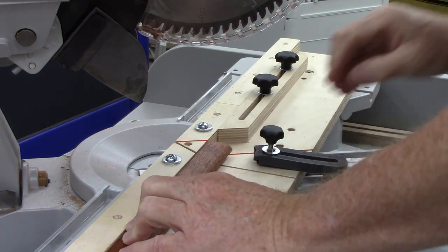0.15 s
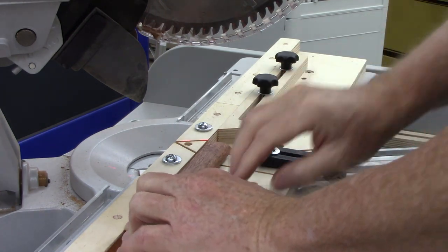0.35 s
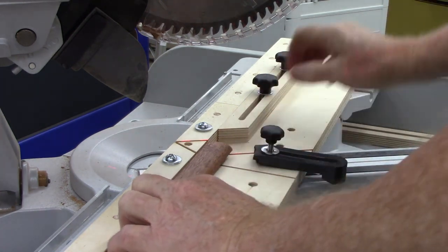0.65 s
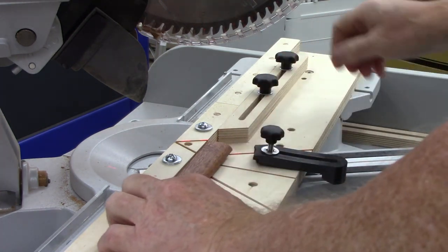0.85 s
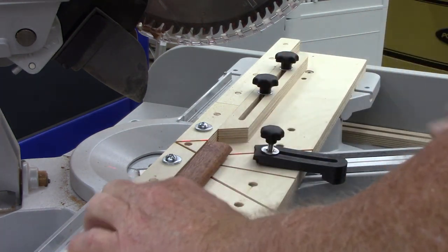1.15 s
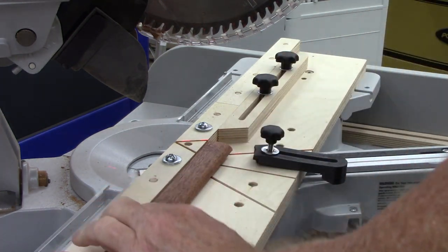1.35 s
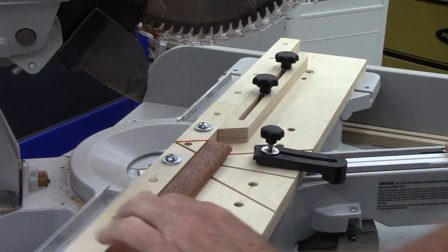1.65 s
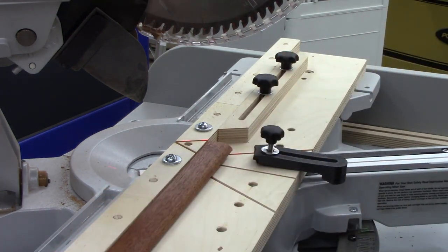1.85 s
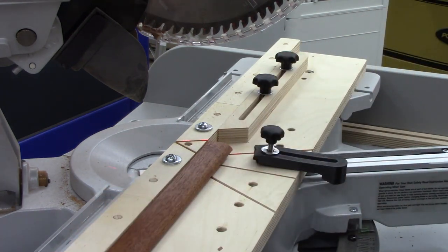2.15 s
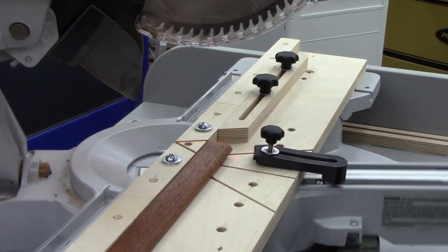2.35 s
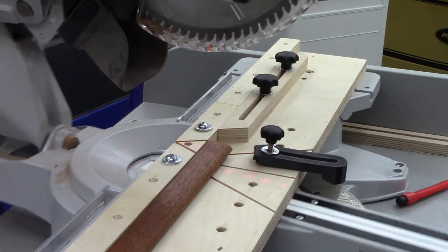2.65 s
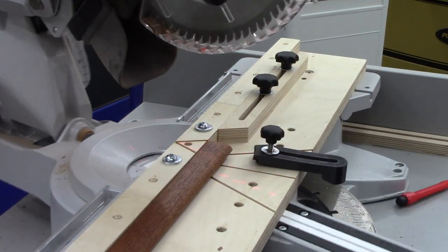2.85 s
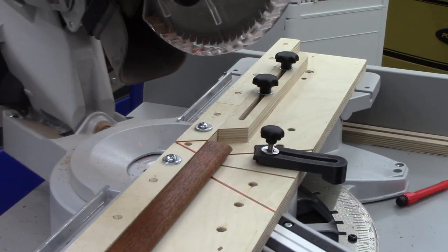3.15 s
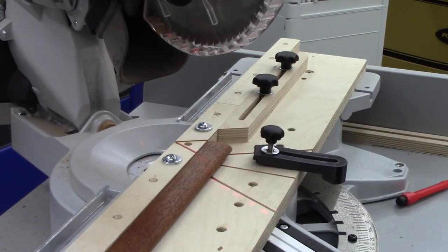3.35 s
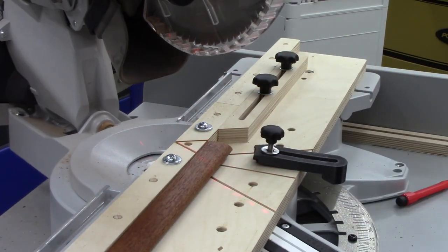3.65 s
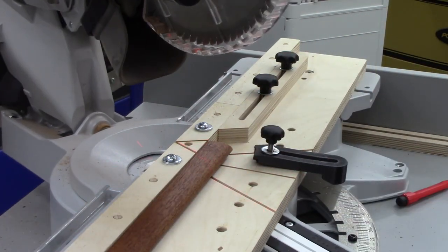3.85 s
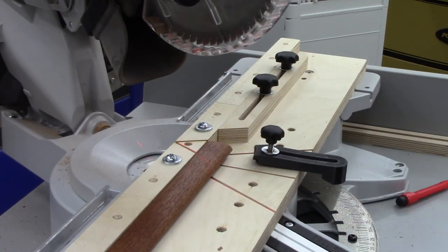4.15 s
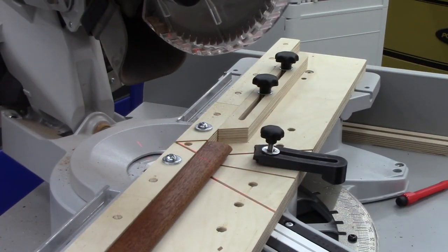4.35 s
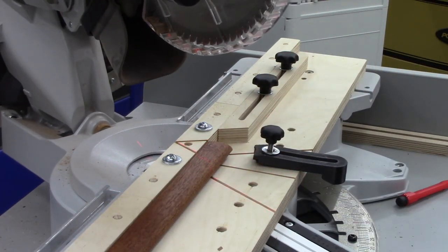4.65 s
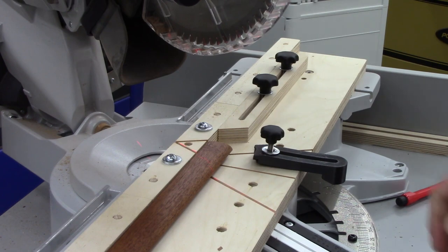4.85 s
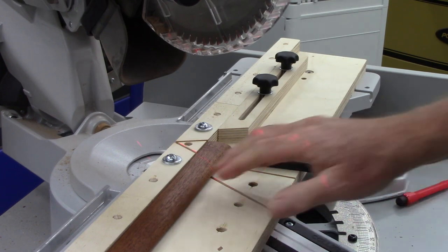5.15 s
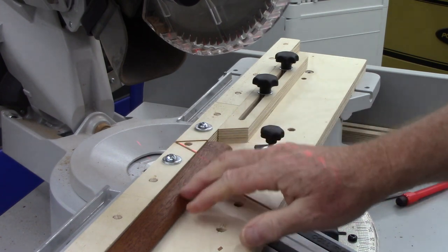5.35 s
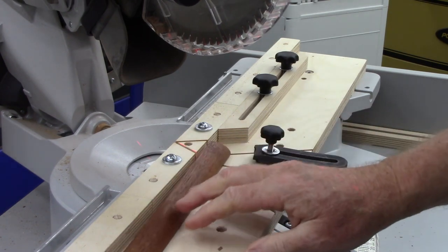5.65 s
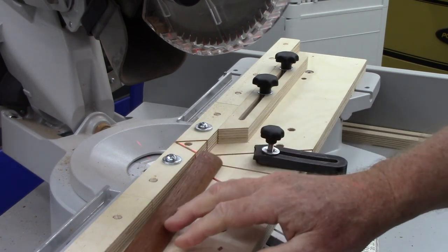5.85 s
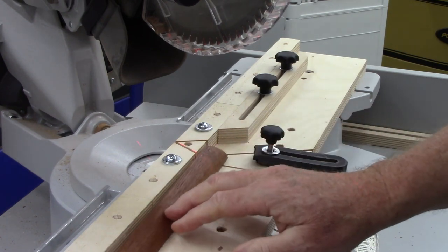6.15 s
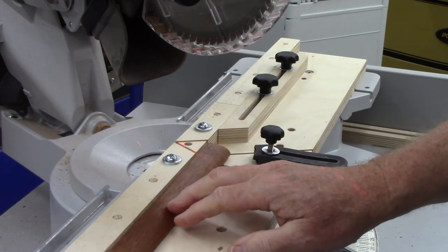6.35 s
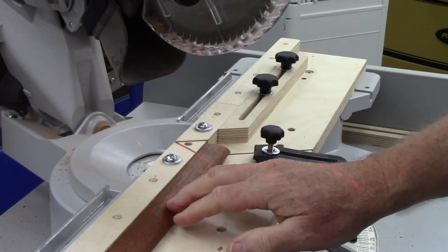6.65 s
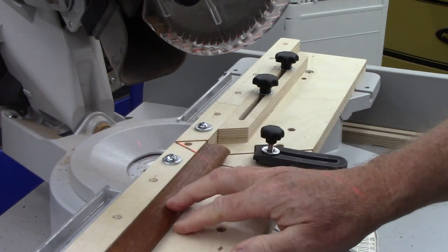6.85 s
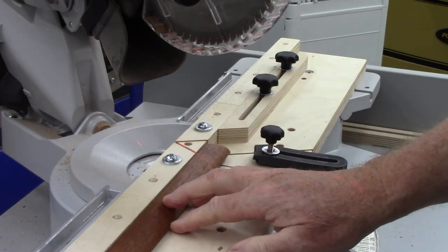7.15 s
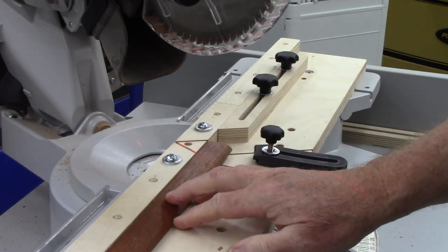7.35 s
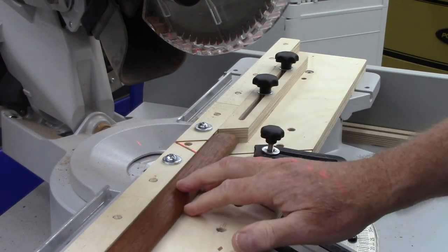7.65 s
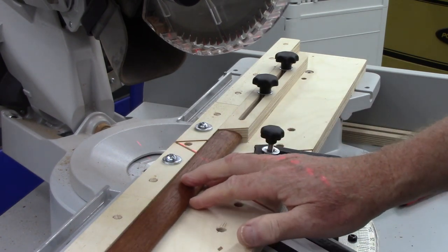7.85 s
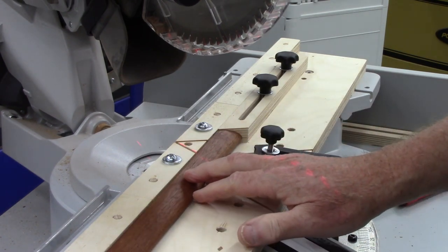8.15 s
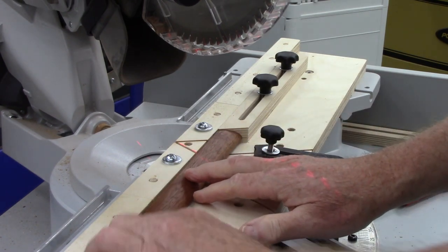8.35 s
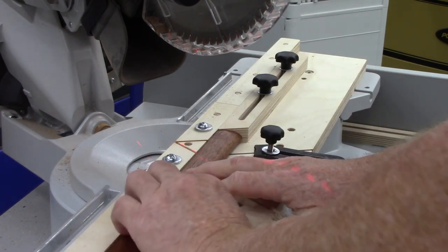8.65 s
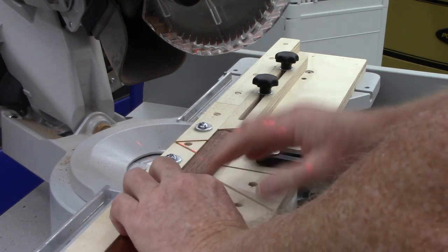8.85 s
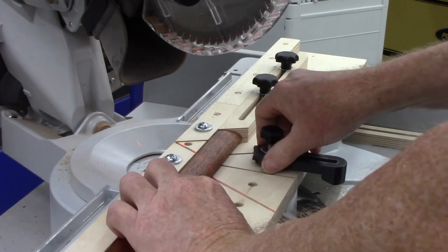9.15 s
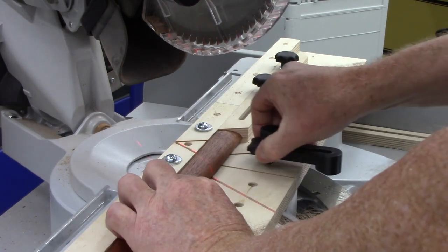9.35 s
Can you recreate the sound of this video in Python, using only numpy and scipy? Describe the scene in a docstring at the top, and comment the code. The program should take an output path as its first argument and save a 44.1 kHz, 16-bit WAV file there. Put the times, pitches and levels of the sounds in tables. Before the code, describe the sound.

In a workshop with steady low hum, the bang of a cut dies away as a saw blade winds down in an airy whoosh. A clamp clacks, a lever bangs open, a hand brushes plywood, the metal table scrapes over clicking detents and slams, then locks very loudly. A wood strip is knocked and slid with short squeaks, and a plastic clamp clatters shut. Close microphone, short room ring.

```python
"""In a workshop, a miter saw coasts down while the last bang of its cut dies away in the room.
A clamp clacks, the miter lock opens, the saw table scrapes round over its detents, slams home and is locked.
A wood strip is knocked and slid into place on a plywood sled and clamped. Blows are ringing modes with noise
bursts, rubbing is uneven noise through resonances, the blade is air noise swishing once a turn with faint tones.
Steady shop noise lies behind it all; a limiter and a soft clip hold back the loudest blows."""
import sys
import numpy as np
from scipy import signal
from scipy.fft import rfft, irfft, next_fast_len
from scipy.io import wavfile
from scipy.ndimage import uniform_filter1d, minimum_filter1d, map_coordinates

SR = 44100
rng = np.random.default_rng(int(sys.argv[2]) if len(sys.argv) > 2 else 0)


def unload_wav(signal):
    """Save mono or channel-first audio to the path in sys.argv[1] as 16-bit WAV at rate SR, clipped to [-1, 1]."""
    wavfile.write(
        sys.argv[1],
        SR,
        np.round(np.clip(np.atleast_2d(signal).T, -1, 1) * 32767).astype(np.int16),
    )


N = 418509
TIME = np.arange(N) / SR

# The bands of a blow's thud, clack, crack and tick. Each row: lower edge in Hz, upper edge in Hz.
BLOW_BANDS = [(150, 650), (650, 2000), (2000, 6000), (6000, 15000)]
# The tone of the room's answer. Each row: frequency in Hz, relative level in dB.
ROOM_TONE = [(100, 17.5), (350, 1.5), (1000, -0.5), (3000, 0), (8000, -3), (15000, -5.5)]
# The tone of the sliding strip and of the clamp's knob. Each row: frequency in Hz, relative level in dB.
STRIP_TONE = [(120, -44), (200, -5), (318, 8), (393, -2), (437, -37), (581, 2), (658, -40), (815, -3.5),
              (1140, -10), (1410, -14), (1750, -21), (3320, -22), (4180, -31), (6400, -21), (14000, -52)]


def amp(db):
    """Amplitude factor of a level in dB."""
    return 10 ** (np.asarray(db) / 20)


def unit(x):
    """x scaled to rms 1."""
    return x / np.sqrt(np.mean(x ** 2) + 1e-20)


def along(points, hz):
    """Interpolate (Hz, value) points on a log frequency axis."""
    f, v = np.transpose(points)
    return np.interp(np.log(hz + 1), np.log(f + 1), v)


def wobble(rate, size=N):
    """A smooth random curve with rate knots a second."""
    knots = rng.standard_normal(int(size * rate / SR) + 4)
    return map_coordinates(knots, [np.arange(size) * rate / SR], order=2)


def fade(t, t60):
    """Exponential decay that falls 60 dB in t60 seconds."""
    return np.exp(-np.log(1000) * t / t60)


def filtered(x, response):
    """x shaped by a response of frequency; the padding keeps the end off the start."""
    size = next_fast_len(x.shape[-1] + 4096, True)
    spectrum = rfft(x, size) * response(np.fft.rfftfreq(size, 1 / SR))
    return irfft(spectrum, size)[..., :x.shape[-1]]


def coloured(x, spectrum):
    """x shaped by a (Hz, dB) spectrum, at rms 1."""
    return unit(filtered(x, lambda hz: amp(along(spectrum, hz))))


def add(track, s, x):
    """Mix x into the track at time s in seconds."""
    part = track[max(round(s * SR), 0):][:len(x)]
    part += x[:len(part)]


def dying(spectrum, t60s):
    """Noise of energy 1 in which each frequency dies at its own speed."""
    hz, t, frames = signal.stft(rng.standard_normal(SR * 2 // 3), SR, nperseg=256)
    level = amp(along(spectrum, hz)[:, None])
    decay = fade(t, along(t60s, hz)[:, None])
    tail = signal.istft(frames * level * decay, SR, nperseg=256)[1]
    return tail / np.linalg.norm(tail)


def in_room(x, build_s=0.016, rattle_db=1.5):
    """The workshop's answer builds up as the walls reply; loose parts rattle in it."""
    # The room's decay. Each row: frequency in Hz, t60 in seconds.
    room_t60s = [(100, 0.62), (260, 0.32), (700, 0.67), (1840, 0.61), (4850, 0.62), (12800, 0.42)]
    tail = dying(ROOM_TONE, room_t60s)
    tail = tail * (1 - np.exp(-(np.arange(len(tail)) / SR / build_s) ** 2))
    rattle = unit(amp(rattle_db * wobble(169.4, size=len(tail))))
    return signal.fftconvolve(x, tail * rattle)


def contacts(rows, bounce_s, loss_db, dulling_db, tick_db):
    """Each blow may bounce, losing loss_db and dulling_db per octave each time: (s, band levels in dB)."""
    centres = np.sqrt(np.prod(BLOW_BANDS, axis=1))
    crack_octaves, tick_octaves = np.log2(centres[2:] / centres[1])
    hits = []
    for s, strength_db, thud_db, brightness, count in rows:
        for k in range(round(count)):
            slope = brightness - dulling_db * k
            colour = np.array([thud_db, 0, slope * crack_octaves, slope * tick_octaves + tick_db])
            hits.append((s + k * bounce_s, strength_db - loss_db * k + colour))
    return hits


def voiced(x, band_db, top_db):
    """Equalize a blow so that its first 12 ms come near the given level in each band."""
    head = x[:round(.012 * SR)]
    hz = np.fft.rfftfreq(SR // 10, 1 / SR)
    power = 2 * abs(rfft(head, SR // 10)) ** 2 / (SR // 10 * len(head))
    gains = []
    for (low, high), db in zip(BLOW_BANDS, band_db):
        present_db = 10 * np.log10(power[(hz > low) & (hz < high)].sum())
        gains.append((np.sqrt(low * high), db - present_db))
    bottom = [(60, gains[0][1] - 10), (170, gains[0][1] - 1)]
    gains = bottom + gains + [(16000, gains[-1][1] + top_db)]
    # minimum phase: nothing sounds before the contact
    gain = amp(along(gains, np.fft.rfftfreq(len(x), 1 / SR)))
    cepstrum = irfft(np.log(gain), len(x))
    cepstrum[1:] *= 2 * (np.arange(1, len(x)) < len(x) // 2)
    return irfft(rfft(x) * np.exp(rfft(cepstrum)), len(x))


def ringing(modes, t, ring_scale):
    """A struck part's modes as decaying sines, each with a slightly new strength and pitch."""
    ring = np.zeros(len(t))
    draws = rng.standard_normal((len(modes), 2))
    for k, ((hz, width, db), (a, b)) in enumerate(zip(modes, draws)):
        strength = amp(db + 2 * a) * np.sqrt(width) * (-1) ** k
        tone = np.sin(2 * np.pi * hz * (1 + 0.0036 * b) * t)
        ring += strength * tone * np.exp(-np.pi * width * t / ring_scale)
    return ring


def blows(hits, modes, ring_scale, crack_db, crack_t60, clatter_db, clatter_t60, room_db, attack_s, low_hz, top_db):
    """Each contact rings the modes, with a short crack and a clatter of dense low modes; the room answers."""
    crack_tone = [(200, -30.5), (900, -4), (6000, 2.5), (10000, -1), (16000, -8.5)]
    clatter_tone = [(60, -18.0), (160, -16.0), (330, 1.5), (1400, -9.5), (4000, -21.5), (12000, -33)]
    low_cut = signal.butter(2, low_hz, "high", fs=SR, output="sos")
    track = np.zeros(N)
    t = np.arange(SR // 5) / SR
    for s, band_db in hits:
        ring = ringing(modes, t, ring_scale)
        crack = coloured(rng.standard_normal(len(t)), crack_tone) * fade(t, crack_t60)
        clatter = coloured(rng.standard_normal(len(t)), clatter_tone) * fade(t, clatter_t60)
        blow = unit(ring) + amp(crack_db) * unit(crack) + amp(clatter_db) * unit(clatter)
        blow = blow * (1 - np.exp(-t / attack_s))
        blow = voiced(signal.sosfilt(low_cut, blow), band_db, top_db)
        add(track, s, blow)
        add(track, s, amp(room_db) * in_room(blow))
    return track


def strokes(rows, attack_s, release_t60, uneven_db=2.03):
    """Hiss and body gains of strokes: each gathers speed, holds under uneven pressure and dies away."""
    gains = np.zeros((2, N))
    for s, length, *level_db in rows:
        attack = np.clip((TIME - s) / attack_s, 0, 1)
        release = fade(np.maximum(TIME - s - length, 0), release_t60)
        gains += amp(level_db)[:, None] * attack * release
    return gains * amp(uneven_db * wobble(24))


def rub(gains, spectrum, modes, split_hz, grain_db, modes_db, hiss_gain_db, body_gain_db):
    """Sliding contact: uneven tiny slips hiss at the surface and stir the body's resonances."""
    slips = rng.standard_normal(N) * amp(grain_db * wobble(500) + 1.75 * wobble(35))

    def resonances(hz):
        """Sum of band-pass resonances with alternating signs."""
        total = 0
        for k, (centre, width, db) in enumerate(modes):
            damping = 1j * hz * width
            total = total + (-1) ** k * amp(db) * damping / (centre * centre - hz * hz + damping)
        return total

    def low_part(hz):
        """The share of the sound below the split."""
        return 1 / (1 + (hz / split_hz) ** 4)

    sound = coloured(slips, spectrum) + amp(modes_db) * unit(filtered(slips, resonances))
    hiss = unit(filtered(sound, lambda hz: 1 - low_part(hz)))
    body = unit(filtered(sound, low_part))
    return gains[0] * amp(hiss_gain_db) * hiss + gains[1] * amp(body_gain_db) * body


def shop_noise(level_db=-47.5):
    """Steady workshop noise, barely wavering in level: independent mid and side signals."""
    # Its tone. Each row: frequency in Hz, relative level in dB.
    shop_tone = [(15, -61), (25, -45), (43, -15.5), (84, -16.5), (108, -5), (145, -5.5), (170, -3),
                 (476, -4), (607, -5), (714, -6), (887, -9), (1890, -18.5), (3080, -24), (4740, -25.5),
                 (16000, -39)]
    level = amp(level_db + 0.22 * wobble(27))
    return level * coloured(rng.standard_normal((2, N)), shop_tone)


def saw(bang_db=-14, ring_db=-3, swish=.1):
    """The last bang fades; drag and friction brake the blade, which swishes once a turn and rings faintly."""
    # The bang's tone. Each row: frequency in Hz, relative level in dB.
    bang_tone = [(47, -66), (80, -54), (168, -29), (285, -19.5), (363, -22), (515, -10.5), (587, -12),
                 (763, -8.5), (1130, -15), (2230, -19), (5720, -31), (12900, -48.5), (15000, -71)]
    # The blade's air noise. Each row: frequency in Hz, relative level in dB.
    air_tone = [(47, -57), (80, -23.5), (141, -2), (285, 0.5), (371, -3), (432, -2.5), (909, -4.5),
                (1210, -12.5), (1720, -10), (3380, -18), (4600, -26), (15000, -47)]
    # The blade's faint ringing. Each row: frequency in Hz, level in dB before ring_db.
    blade_ring = [(925.9, -54), (1486, -65), (2503, -63), (5556, -62)]
    first_turns_per_s, first_air_db = 43, -36
    drag_s, stop_s = 3.1, 6  # time constant of air drag; when bearing friction stops the blade
    friction = np.exp(-stop_s / drag_s)
    speed = np.maximum(np.exp(-TIME / drag_s) - friction, 0) / (1 - friction)  # 1 at the start
    turn = 2 * np.pi * np.cumsum(first_turns_per_s * speed) / SR
    air = coloured(rng.standard_normal(N), air_tone) * (1 + swish * np.sin(turn))
    ring = np.zeros(N)
    for hz, db in blade_ring:
        phase = 2 * np.pi * hz * TIME + 1.2 * wobble(25)
        ring += amp(db + ring_db) * np.sqrt(2) * np.sin(phase)
    track = speed * (amp(first_air_db) * air + ring)
    bang_t60s = [(150, 0.66), (800, 0.74), (3000, 0.71), (10000, 0.53)]  # (Hz, s)
    bang = coloured(dying(ROOM_TONE, bang_t60s), bang_tone)
    add(track, 0, amp(bang_db) * bang / np.std(bang[:SR // 50]))  # level of its first 20 ms
    return track


def chatter(waver=0.022, room_db=-14):
    """The strip chatters briefly on one wavering note as it sticks and slips."""
    # The notes. Each row: start in seconds, mean pitch in Hz, peak level in dB, length in seconds.
    notes = [(6.125, 600, -27, 0.06), (7.329, 504, -28, 0.038), (7.378, 492, -24, 0.05),
             (7.592, 570, -44, 0.047), (8.898, 2220, -40.5, 0.01)]
    track = np.zeros(N)
    for s, hz, db, length in notes:
        count = round(length * SR)
        pitch = hz * (1 + waver * wobble(150, size=count))
        phase = 2 * np.pi * np.cumsum(pitch) / SR
        add(track, s, amp(db) * np.hanning(count) * np.sin(phase))
    return track + amp(room_db) * in_room(track)[:N]


def sled():
    """A hand and fingertips brush off the plywood; the strip is knocked, drawn back and pushed along the fence."""
    # Rubbing strokes of hand, fingertips, drawn strip and pushed strip. Each row: start in seconds,
    # length in seconds before the release, hiss in dB, body in dB, both before the gains below.
    hand_strokes = [(1.39, .25, -37.5, -36), (1.62, .25, -37, -41)]
    finger_strokes = [(1.67, 0.16, -31.5, -57)]
    draw_strokes = [(5.42, 0.17, -51, -47.5), (5.72, .16, -49.5, -46.5), (6.02, 0.18, -50, -41),
                    (6.28, 0.096, -56.5, -51.5), (6.84, 0.12, -67, -54.5), (7.1, .05, -56, -48),
                    (8.46, .11, -53, -58)]
    push_strokes = [(7.31, .18, -53, -37), (7.48, .15, -56.5, -39), (7.7, 0.04, -59, -47)]
    # Tones of skin on plywood and of the pushed strip. Each row: frequency in Hz, relative level in dB.
    skin_tone = [(47, -49), (80, -6), (220, 2), (263, -26), (321, 3), (446, -2), (487, -17), (544, 4.5),
                 (903, -6), (3170, -3), (6860, -15), (15500, -38)]
    push_tone = [(120, -49), (200, -19), (393, 0), (430, -19), (522, -13), (682, -15), (1120, -21),
                 (1390, -19), (1780, -24.5), (2130, -24), (4250, -30.5), (5860, -31), (14000, -60)]
    # Resonances that rubbing stirs. Each row: frequency in Hz, width in Hz, relative level in dB.
    strip_modes = [(385, 47, 25), (579, 18, 27), (2670, 140, -1.5), (3340, 154, 2.5), (3830, 88, -1.5),
                   (4860, 210, -5), (6170, 790, -18)]
    finger_modes = [(3080, 93, -1), (3350, 140, 0.5), (3480, 130, -1), (4100, 210, -5.5)]
    push_modes = [(540, 52, 3), (1414, 64, -5.5), (2110, 47, -22), (2490, 57, -28), (2730, 53, -20),
                  (4970, 250, -27), (6130, 470, -29.5), (6290, 65, -31)]
    # Knocks of the strip. Each row: start in seconds, strength in dB, thud in dB relative to it,
    # brightness in dB per octave, number of contacts.
    strip_blows = [(5.032, -42.5, 1, -16, 1), (5.216, -31.5, 6, -11.5, 1), (5.523, -26, 5.5, -12.5, 2),
                   (6.005, -26.5, -1.5, -8.5, 2), (6.39, -54, 25.5, -5, 1), (7.19, -55.5, 19.5, -5, 1),
                   (7.389, -42, 9, -11, 1), (7.76, -27.5, 4, -16, 1), (7.928, -35, -10, -19, 1),
                   (8.688, -53.5, 14, -4.5, 1)]
    # The knocked sled. Each row: frequency in Hz, width in Hz before ring_scale divides it, relative level in dB.
    sled_modes = [(317, 40, -9), (410, 34, 5), (486, 17, -4.5), (569, 89, 5.5), (780, 150, -14.5),
                  (890, 120, 2), (1220, 220, -23), (1470, 74, -2.5), (2950, 100, -24), (3260, 100, 0)]
    hand = rub(strokes(hand_strokes, attack_s=0.077, release_t60=.65), skin_tone, strip_modes,
               split_hz=1300, grain_db=0.5, modes_db=-18, hiss_gain_db=0.0, body_gain_db=-6.5)
    fingers = rub(strokes(finger_strokes, attack_s=0.088, release_t60=0.7), skin_tone, finger_modes,
                  split_hz=2140, grain_db=-1.5, modes_db=-0.5, hiss_gain_db=0.5, body_gain_db=-7.0)
    draw = rub(strokes(draw_strokes, attack_s=0.024, release_t60=0.45), STRIP_TONE, strip_modes,
               split_hz=1270, grain_db=2.0, modes_db=7.5, hiss_gain_db=0.0, body_gain_db=3)
    push = rub(strokes(push_strokes, attack_s=0.027, release_t60=0.46), push_tone, push_modes,
               split_hz=1510, grain_db=2.0, modes_db=1.5, hiss_gain_db=2.0, body_gain_db=2.0)
    knocks = blows(contacts(strip_blows, bounce_s=.014, loss_db=8, dulling_db=7, tick_db=0.5), sled_modes,
                   ring_scale=1.5, crack_db=-10.0, crack_t60=0.025, clatter_db=0.5, clatter_t60=0.057,
                   room_db=-7, attack_s=0.0013, low_hz=185, top_db=-6)
    return hand + fingers + draw + push + knocks


def clamp():
    """The plastic hold-down clacks on the sled, its washer pings and its knob grinds on the thread."""
    # Clacks. Each row: start in seconds, strength in dB, thud in dB relative to it,
    # brightness in dB per octave, number of contacts.
    clamp_blows = [(.509, -26, 5, -0.5, 1), (.52, -28, 8, 2.5, 1), (.5295, -24, 6, 3, 2),
                   (9.029, -36.5, 13.5, -4, 1), (9.056, -18, -2.5, 0.5, 1), (9.184, -37.5, 12, -2, 2),
                   (9.215, -26.5, -27, -3.5, 1), (9.221, -29, 5, -2.5, 1), (9.246, -13, -19, -6, 1),
                   (9.32, -45.5, -10, 3, 1), (9.428, -21, 6, -9, 5)]
    # The clamp's resonances. Each row: frequency in Hz, width in Hz (ring_scale divides it in blows),
    # relative level in dB.
    clamp_modes = [(327, 16, -3.5), (403.6, 25.4, 7.5), (581, 14, -5), (730, 86, -6), (1066, 35, -4),
                   (1383, 74, -4.5), (1610, 92, -9.5), (2360, 380, -12), (3680, 320, -11), (4300, 180, -21),
                   (6600, 450, -24), (7900, 510, -22), (11200, 500, -36)]
    # The loose steel washer. Each row: start in seconds, frequency in Hz, level in dB, t60 in seconds.
    washer_pings = [(.531, 15620, -37, .3), (9.057, 15620, -46, 0.35)]
    # Grinding of the knob. Each row: start in seconds, length in seconds before the release,
    # hiss in dB, body in dB, both before the gains below.
    knob_strokes = [(9.15, 0.04, -33.5, -29), (9.34, 0.086, -41, -38), (9.43, .06, -49, -16)]
    track = blows(contacts(clamp_blows, bounce_s=0.011, loss_db=1.0, dulling_db=1.0, tick_db=-8.5), clamp_modes,
                  ring_scale=0.97, crack_db=-17, crack_t60=0.012, clatter_db=-4.0, clatter_t60=0.055,
                  room_db=-9.5, attack_s=0.00038, low_hz=180, top_db=-14)
    t = np.arange(SR // 2) / SR
    for s, hz, db, t60 in washer_pings:
        add(track, s, amp(db) * np.sin(2 * np.pi * hz * t) * fade(t, t60))
    knob = rub(strokes(knob_strokes, attack_s=0.066, release_t60=0.5), STRIP_TONE, clamp_modes,
               split_hz=1300, grain_db=3, modes_db=3.5, hiss_gain_db=-1.5, body_gain_db=3.5)
    return track + knob


def swing(body_db=-34, body_follows=0.56, edge_s=.03, flutter_db=1.3):
    """Swinging table's gains: the hiss follows the effort and flutters, the casting's drone follows less."""
    # How hard the table scrapes. Each row: time in seconds, level in dB before the rubbing gains.
    effort = [(2.18, -58.5), (2.298, -42.5), (2.446, -35.5), (2.546, -31.5), (2.766, -45.5), (3.106, -46.5),
              (3.254, -65), (3.518, -71), (3.75, -44)]
    s, effort_db = np.transpose(effort)
    level_db = np.interp(TIME, s, effort_db)
    touch = np.clip(np.minimum(TIME - s[0], s[-1] - TIME) / edge_s + 1, 0, 1)
    hiss_db = level_db + flutter_db * wobble(22.11)
    drone_db = body_db + body_follows * (level_db - effort_db.max())
    return touch * amp([hiss_db, drone_db])


def miter_table():
    """The lock lever opens, the table scrapes round over its detents, its latch drags, it slams and is locked."""
    # Blows of the lock and of the detents. Each row: start in seconds, strength in dB,
    # thud in dB relative to it, brightness in dB per octave, number of contacts.
    lock_blows = [(1.19, -12, 0.5, -2.5, 2), (1.397, -28.5, 9.5, -6, 1), (1.415, -40.5, 20, -0.5, 1),
                  (1.529, -37, 15, 0.5, 1), (1.931, -31, -4.5, -3.5, 1), (2.046, -30.5, -8, -6.5, 1),
                  (4.264, -1.5, -2, -2, 3), (4.554, -21.5, 5, -6, 1)]
    detent_blows = [(2.624, -37, 3, -4, 1), (2.7595, -24.5, -4.5, -4.5, 1), (2.951, -40, 2.5, -6.5, 1),
                    (3.151, -22, -0.5, -1.5, 1), (3.345, -41, 4, -10.5, 1), (3.43, -29, -2, -4, 2),
                    (3.7595, -7, -1, 0.55, 2)]
    # What they ring with. Each row: frequency in Hz, width in Hz before ring_scale divides it, relative level in dB.
    lock_modes = [(302, 37, -4.5), (332, 52, 4), (398, 25, -6.5), (542, 35, -7), (597, 34, -2.5),
                  (760, 82, -12.5), (860, 34, -6.5), (1020, 67, -6), (1400, 82, -3.5), (1540, 30, -7),
                  (1522, 15, -13), (1950, 37, -11), (2320, 100, -21), (2884, 47, -15), (3014, 200, -7),
                  (4730, 260, -11), (6560, 440, -22)]
    detent_modes = [(360.4, 12, 1), (597, 75, 4.5), (940, 13, -16), (1332, 22, 0.5), (1610, 39.2, -10),
                    (2347, 36, -5), (3236, 42, -3), (3450, 60, -3.5), (3960, 54, -25), (5360, 190, -9.5),
                    (6160, 70, 4.5), (6620, 60, -1), (7000, 60, -2.5), (8550, 130, -4), (9600, 260, -10),
                    (13740, 440, -11.5)]
    # The tone of the scraping table. Each row: frequency in Hz, relative level in dB.
    table_tone = [(88, -28), (150, -12), (269, -34), (361, -14.5), (474, -24.5), (575, -3.5), (622, -18),
                  (1280, -21.5), (2210, -25), (3390, -20), (4450, -18.5), (7110, -7.5), (9900, -19.5),
                  (13800, -23.5), (15800, -28)]
    # Resonances that scraping and dragging stir. Each row: frequency in Hz, width in Hz, relative level in dB.
    table_modes = [(370, 40, 4), (1145, 17, -3), (1292, 37, -10.5), (1475, 24, -5), (2980, 48, -25),
                   (3320, 220, -2.5), (5670, 51, -11), (6540, 82, -1), (7200, 830, -3), (7920, 110, -8)]
    latch_modes = [(575, 60, 12), (770, 63, -9), (1340, 90, -14), (5850, 300, -8)]
    # Drags of the latch. Each row: start in seconds, length in seconds before the release,
    # hiss in dB, body in dB, both before the gains below.
    latch_strokes = [(3.722, 0.04, -36, -24), (4.235, 0.031, -42.5, -43), (4.57, 0.033, -45, -41)]
    lock = blows(contacts(lock_blows, bounce_s=.008, loss_db=0.44, dulling_db=-1.4, tick_db=-10), lock_modes,
                 ring_scale=0.99, crack_db=-3.5, crack_t60=0.049, clatter_db=-1, clatter_t60=0.16,
                 room_db=-10.0, attack_s=0.00023, low_hz=115, top_db=-9)
    detents = blows(contacts(detent_blows, bounce_s=.005, loss_db=2.0, dulling_db=1.0, tick_db=4.0), detent_modes,
                    ring_scale=0.82, crack_db=1.5, crack_t60=0.045, clatter_db=0, clatter_t60=0.13,
                    room_db=-7.5, attack_s=0.0005, low_hz=150, top_db=-4)
    scrape = rub(swing(), table_tone, table_modes,
                 split_hz=2500, grain_db=1.0, modes_db=-3, hiss_gain_db=1.0, body_gain_db=1.5)
    latch = rub(strokes(latch_strokes, attack_s=0.033, release_t60=.08), table_tone, latch_modes,
                split_hz=960, grain_db=-2.5, modes_db=20.0, hiss_gain_db=3.5, body_gain_db=0.5)
    return lock + detents + scrape + latch


def scene(scatter_t60=0.11):
    """The work sits in the middle; scattered sound differs slightly between the two close capsules."""
    # Stereo width of the work and of the shop noise. Each row: frequency in Hz, side gain in dB.
    work_width = [(60, -21), (110, -18), (200, -40), (380, -45), (700, -31.5), (1290, -29), (2380, -21),
                  (4400, -18), (8120, -19.5), (15000, -30.5)]
    shop_width = [(60, 4), (110, -11.5), (200, -9), (380, -10.5), (700, -13), (1290, -11), (2380, -7.5),
                  (4400, -10.5), (8120, -10.5), (15000, -17)]
    shop_mid, shop_side = shop_noise()
    work = saw() + chatter() + sled() + clamp() + miter_table()
    t = np.arange(SR // 10) / SR
    scatter = rng.standard_normal(len(t)) * fade(t, scatter_t60)
    scattered = signal.fftconvolve(work, scatter / np.linalg.norm(scatter))[:N]
    mid = work + shop_mid
    work_side = filtered(scattered, lambda hz: amp(along(work_width, hz)))
    side = work_side + filtered(shop_side, lambda hz: amp(along(shop_width, hz)))
    return np.array([mid + side, mid - side])


def record(dry, ceiling_db=1.0, release_db_per_s=260, clip_db=-1.5, top_hz=15900):
    """A limiter ducks at once and swells back, a soft clip rounds the rest; then tone and band limit."""
    # The microphone's tone. Each row: frequency in Hz, gain in dB.
    microphone_tone = [(30, -8), (100, -3), (150, -0.5), (11000, 0), (13000, -2), (16000, -5.5)]
    over_db = np.maximum(20 * np.log10(abs(dry).max(axis=0) + 1e-9) - ceiling_db, 0)
    released_db = release_db_per_s * TIME
    duck_db = np.maximum.accumulate(over_db + released_db) - released_db
    # spread each dip over a few samples, then smooth it
    duck = uniform_filter1d(minimum_filter1d(amp(-duck_db), size=25), size=25)
    held = dry * duck
    rounded = held / (1 + (held / amp(clip_db)) ** 6) ** (1 / 6)
    ends = np.clip(np.minimum(TIME, TIME[-1] - TIME) / .004, 0, 1)  # 4 ms fades
    return filtered(rounded * ends,
                    lambda hz: amp(along(microphone_tone, hz)) / np.sqrt(1 + (hz / top_hz) ** 200))


dry = scene()
out = record(dry)
unload_wav(out)
```